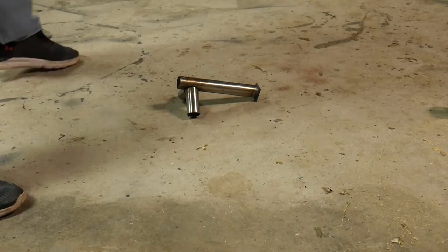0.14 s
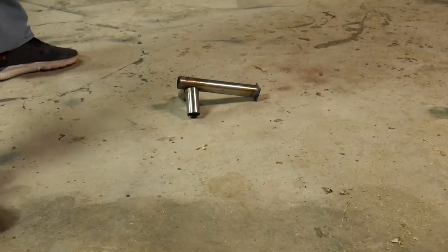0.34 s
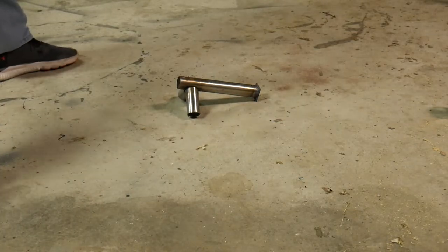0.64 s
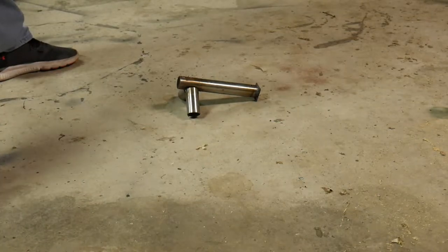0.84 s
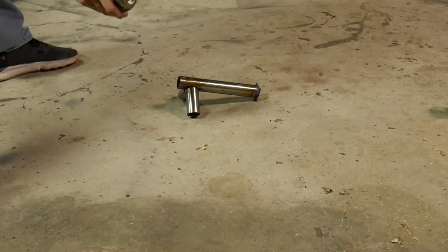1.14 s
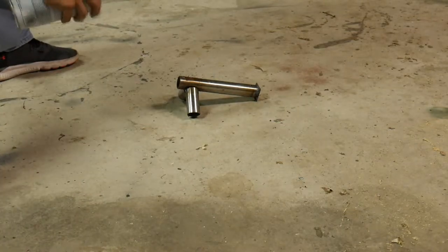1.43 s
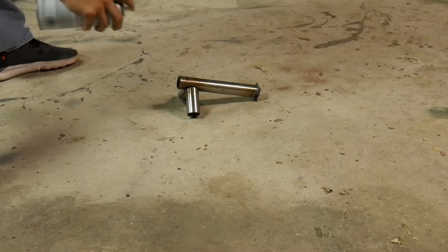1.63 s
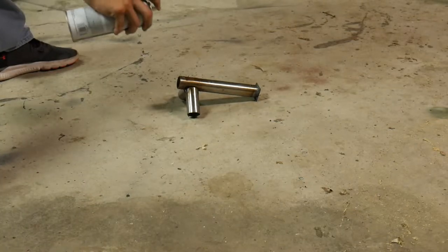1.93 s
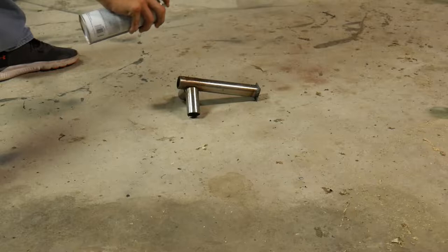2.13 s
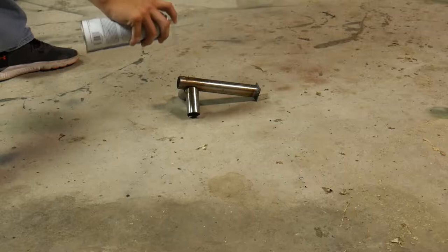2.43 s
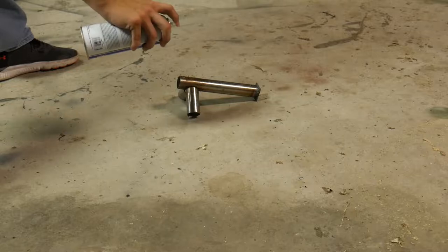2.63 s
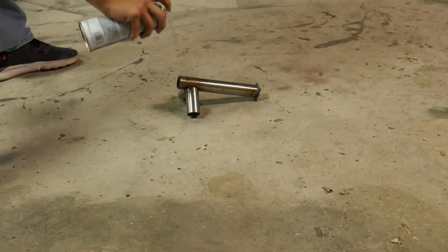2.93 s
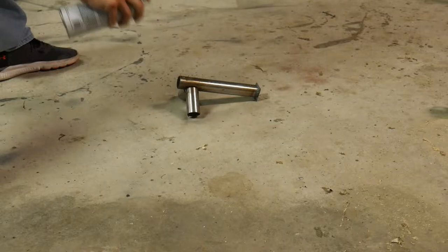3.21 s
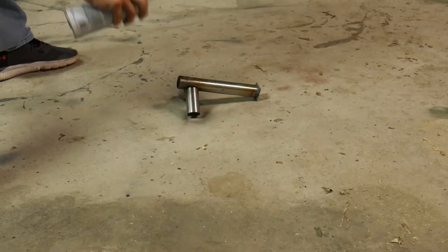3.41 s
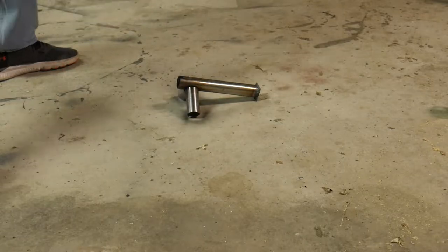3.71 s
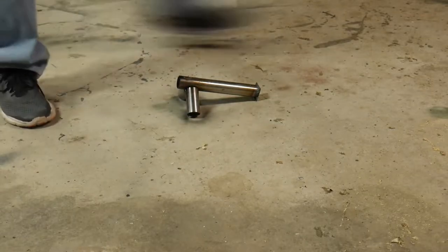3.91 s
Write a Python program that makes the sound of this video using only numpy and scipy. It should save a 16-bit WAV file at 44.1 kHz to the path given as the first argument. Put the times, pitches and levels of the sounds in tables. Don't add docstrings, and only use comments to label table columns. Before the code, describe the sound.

Shoes scuff gritty concrete, a paint can is shaken in a hard metallic rattle, then the nozzle puffs in brief hissing bursts.

```python
import sys
import numpy as np
from scipy import signal
from scipy.fft import rfft, irfft
from scipy.io import wavfile
from scipy.ndimage import uniform_filter1d

SR = 44100
rng = np.random.default_rng(int(sys.argv[2]) if len(sys.argv) > 2 else 0)


def natural_amplitude(level_db):
    exponent = np.asarray(level_db, float) / 20
    return 10 ** exponent


def persist_wave(psi):
    counts = np.round(np.clip(psi, -1, 1) * 32767).astype(np.int16)
    wavfile.write(sys.argv[1], SR, np.atleast_2d(counts).T)


N = 179090
TIME = np.arange(N) / SR
CONTACT_MS = 2.5


def knocks():
    length = 1024
    near, around = np.zeros(N + length), np.zeros(N + length)
    t = TIME[:length]
    impulse = 1. * (t == 0)
    for s, db, *colour in contacts():
        push = rng.standard_normal(length) * np.exp(-(1000 * t / CONTACT_MS) ** 2)
        push[0] += 3.0
        body = can(push, *colour, blur=1.0)
        body *= natural_amplitude(db) / np.abs(body).max()
        spread = can(impulse, *colour, blur=2.1)
        i = int((s + 0.00056) * SR)
        near[i:i + length] += body
        around[i:i + length] += spread * np.std(body) / np.std(spread)
    return near[:N], around[:N]


# (t/s, peak level/dB, dome ring f/Hz, wall ring level/dB, crack level/dB)
BALL_KNOCKS = [(0.7679, -14, 1430, -21, -21), (.834, -26, 1590, -1, 5), (.849, -28, 1560, -16, -24),
               (.99, -6, 1710, -31, -16), (.997, -16, 1480, -21, -21), (1.047, -18, 1340, -27, -16),
               (1.113, 0.5, 1760, -2.5, 2), (1.154, -8, 1400, -10, -22), (1.251, 0.5, 1320, -14, 2),
               (1.458, -11, 1460, -30, -8), (1.461, -4, 1750, -12, -4.5), (1.492, -12.5, 1380, -12.5, -22),
               (1.56, -30.5, 1200, -31, -21), (1.616, -18, 1270, -12, -19.5),
               (1.709, -21.5, 1360, -12, -16), (1.767, -21.5, 1424, -24.5, -18.5),
               (1.809, -28.5, 1540, -19, -15), (1.837, -29, 1040, -13, -17.5),
               (1.976, -36.5, 1080, -31.5, -17.5), (1.997, -39, 1560, -21, -32.5),
               (3.073, -19.5, 1300, -15, -2), (3.1047, -31.5, 1540, -12, -18)]
# (t/s, peak level/dB, crack level/dB,
# crack centre f/Hz)
SMALL_TICKS = [(.014, -51, 4, 7500), (.084, -30, -11.5, 7100), (.109, -39, -17, 7000),
               (.211, -37.5, -18.5, 3430), (.246, -45.5, -10.5, 5870), (.257, -40, -6.5, 4060),
               (.309, -34.5, -7.5, 4120), (.321, -33, -8.5, 3200), (.358, -23, 0.5, 7930),
               (.57, -35, 2, 5500), (.61, -33, -18.5, 3950), (.62, -32.5, -10, 5940),
               (.628, -24.5, -13.5, 3470), (.648, -27, -2.5, 3230), (.659, -36, -5, 3500),
               (2.489, -27.5, -5.5, 3715), (2.792, -46.5, -16.5, 6820), (2.81, -50.5, -22.5, 6820),
               (2.822, -47, -28, 6810), (2.834, -41, -33, 8830)]
TICK_DOME_HZ, TICK_WALL_DB = 1451, -25.5
SQUARE_CRACK_HZ, GLANCE_HZ_PER_DB = 3560, 44.5


def contacts():
    hits = [(s, db, TICK_DOME_HZ, TICK_WALL_DB, *crack) for s, db, *crack in SMALL_TICKS]
    for row in BALL_KNOCKS:
        crack_db = row[-1]
        hits.append((*row, SQUARE_CRACK_HZ - GLANCE_HZ_PER_DB * min(crack_db, 0)))
    return sorted(hits)


# (f/Hz, width/Hz, level/dB)
CRACK_RINGS = [(2852, 650, -5), (3790, 610, -10.5), (5550, 1800, -13.5)]
# (f/Hz, width/Hz, level/dB)
FIRST_TICK = [(8630, 470, -17.5), (13500, 4300, -21)]
WALL_HZ, PAINT_DAMPS_UNDER_HZ, FIRST_CONTACT_MS = 2200, 800, 0.8
EDGE_PER_CRACK = 0.15


def can(push, dome_hz, wall_db, crack_db, crack_hz, blur):
    def steep(hz, width, x=push):
        return level(ring_twice(x, hz, blur * width), 0)

    crack = steep(crack_hz, 0.63 * crack_hz)
    crack = crack + sum(natural_amplitude(db) * steep(hz, width) for hz, width, db in CRACK_RINGS)
    dome = steep(dome_hz, 870)
    wall = steep(WALL_HZ, 330 / blur)
    body = dome + natural_amplitude(wall_db + 12) * wall + natural_amplitude(crack_db + 9.5) * crack
    paint = signal.butter(2, PAINT_DAMPS_UNDER_HZ, "high", fs=SR, output="sos")
    body = signal.sosfilt(paint, body)
    first = push * np.exp(-1000 * TIME[:len(push)] / FIRST_CONTACT_MS)
    tick = sum(natural_amplitude(db) * steep(hz, blur * width, first) for hz, width, db in FIRST_TICK)
    return level(body, 0) + natural_amplitude(EDGE_PER_CRACK * (crack_db + 12.5)) * tick


# (start t/s, held/s, hiss level at closing/dB, low roar over hiss/dB, dying/dB per s)
NOZZLE_PRESSES = [(2.487, 0.069, -38, -2.5, 324), (2.6, .02, -61, -4, 153), (2.836, 0.16, -39, -2.5, 300),
                  (3.04, 0.041, -57, -4, 1000), (3.08, 0.0053, -56, -17, 903), (3.105, 0.007, -51, 5, 1500),
                  (3.156, 0.041, -45, -4, 683), (3.247, 0.048, -44.5, -5, 650), (3.344, .063, -46, -5, 852),
                  (3.442, 0.054, -44, -4.5, 604), (3.55, 0.053, -45, -5, 818),
                  (3.645, 0.057, -42.5, -5, 898.5), (3.79, 0.029, -61, 4.5, 1003.5)]
# (f/Hz, density level/dB per Hz)
JET_COLOUR = [(240, -31.5), (400, -8), (460, -14.5), (852, -6.5), (1560, -6), (1990, -11.5), (2320, -6),
              (2550, -4), (3260, -6.5), (4240, -2.5), (6540, -12.5), (8630, -7), (10100, -11), (13700, -9),
              (16000, -19)]
# (f/Hz, width/Hz, level/dB)
NOZZLE_WHISTLE = [(8200, 930, -13), (12640, 700, -16), (13840, 600, -14)]
VALVE_OPENS_S, HISS_SWELL_DB_S, ROAR_SWELL_DB_S = 0.0099, 12.5, 47


def spray():
    gas = rng.standard_normal(N) * natural_amplitude(1.2 * walk(300))
    jet = level(shape(gas, JET_COLOUR), 0)
    jet = jet + sum(level(ring(gas, hz, width), db) for hz, width, db in NOZZLE_WHISTLE)
    low, high = two_bands(jet, 5870)
    hiss, roar = np.zeros(N), np.zeros(N)
    for s, held, db, roar_db, dies in NOZZLE_PRESSES:
        hiss += press(s, held, db, HISS_SWELL_DB_S, VALVE_OPENS_S, dies)
        roar += press(s, held, db + roar_db, ROAR_SWELL_DB_S, VALVE_OPENS_S, dies)
    return hiss * high * natural_amplitude(0.52 * walk(32.6)) + roar * low * natural_amplitude(0.56 * walk(29.2))


# (start t/s, held/s, level at lifting/dB, swell/dB per s, treble over body/dB)
SOLE_DRAGS = [
    (-.05, 0.081, -54.5, -150, -2),
    (.03, 0.36, -58, -2, -5),
    (.215, 0.026, -59.5, 5, 1.5),
    (0.336, .075, -38.5, 0, -5),
    (.41, 0.071, -36, 8, 0),
    (.49, 0.16, -60.5, -110, -2.5),
    (.605, .165, -43.5, 12, -3.5),
    (.77, 0.09, -50.5, -86.5, -2),
    (3.875, 0.071, -41.5, 141, -10.5),
]
# (f/Hz, density level/dB per Hz)
GRIT_COLOUR = [(120, -24), (200, -11), (416, -9.5), (709, -4), (1210, -5.5), (1710, -4), (2380, -3),
               (8580, -1), (11300, -9), (14100, -8), (16000, -29)]
# (start t/s, held/s, level/dB, f/Hz, width/Hz)
NARROW_TONES = [
    (0, 0.17, -60.5, 2080, 350),
    (.35, 0.056, -54, 800, 500),
    (0.438, 0.025, -43, 699, 250),
    (0.631, 0.2, -49.5, 3520, 1400),
    (3.915, 0.033, -58.5, 1140, 600),
]
SOLE_LANDS_S, SOLE_LIFTS_DB_S, SPEED_BRIGHTENS_DB_S = 0.014, 550.5, 10.5


def scuff():
    grain_size = natural_amplitude(1.7 * np.minimum(rng.exponential(size=N), 4))
    grains = rng.standard_normal(N) * (rng.random(N) < 3500 / SR) * grain_size
    rub = level(grains, -3.5) + level(rng.standard_normal(N), -2.5)
    low, high = two_bands(shape(rub * natural_amplitude(2.0 * walk(230)), GRIT_COLOUR), 4000)
    body, treble, tread = np.zeros(N), np.zeros(N), np.zeros(N)
    for s, held, db, swell, treble_db in SOLE_DRAGS:
        body += press(s, held, db, swell, SOLE_LANDS_S, SOLE_LIFTS_DB_S)
        treble += press(s, held, db + treble_db, swell + SPEED_BRIGHTENS_DB_S, SOLE_LANDS_S, SOLE_LIFTS_DB_S)
    for s, held, db, hz, width in NARROW_TONES:
        tread += press(s, held, db, 0, SOLE_LANDS_S, SOLE_LIFTS_DB_S) * level(ring_twice(rub, hz, width), 0)
    return body * low + treble * high + tread


LET_GO_S = 0.0042


def press(start, held, db, swell_db_s, opens, dies_db_s):
    after = TIME - start - held
    opening = 1 - np.exp(-np.maximum(TIME - start, 0) / opens)
    released = LET_GO_S * np.logaddexp(0, np.minimum(after, 1) / LET_GO_S)
    return opening * natural_amplitude(db + swell_db_s * np.clip(after, -held, 0) - dies_db_s * released)


# (t/s, peak level/dB, f/Hz, width/Hz)
SOFT_THUDS = [
    (0.211, -34.5, 397, 350),
    (1.113, -33, 120, 296),
    (3.951, -37.5, 402, 300),
]


def thuds():
    out, push = np.zeros(N), np.pad(np.hanning(40), (0, 4000))
    for s, db, hz, width in SOFT_THUDS:
        body = ring(push, hz, width)
        out[int(s * SR):][:len(push)] += body * natural_amplitude(db) / np.abs(body).max()
    return out


# (f/Hz, t60/s, level/dB)
GARAGE_TAIL = [(350, 0.37, -38), (690, 0.3, -40), (1296, 0.71, -40), (3024, 0.4, -41), (4010, 0.76, -35.5),
               (5940, 0.7, -34), (8140, 0.63, -43), (11740, .7, -40), (14230, 0.46, -32)]
BEFORE_WALLS_DB = -4


def garage(x):
    t = TIME[:SR]
    tail = np.zeros(SR)
    for hz, t60, db in GARAGE_TAIL:
        band = level(ring_twice(rng.standard_normal(SR), hz, hz), -20.5)
        tail += natural_amplitude(db) * np.exp(-np.log(1000) * t / t60) * band
    build_up = np.clip((t - 0.015) / 0.003, 0, 1)
    side_walls = 0.2 * np.exp(-((t - 0.019) / 0.004) ** 2)
    far_wall = 0.31 * np.exp(-((t - 0.032) / 0.012) ** 2)
    tail *= natural_amplitude(BEFORE_WALLS_DB) + build_up + side_walls + far_wall
    return signal.fftconvolve(x, tail)[:N]


# (f/Hz, density level/dB per Hz)
AIR_COLOUR = [(20, -14), (40, -6), (80, -2), (200, -3), (300, -1), (550, -9.5), (1100, -12), (1900, -21),
              (5500, -29), (9500, -34.5), (16000, -33.5)]
AIR_DB = -57.5
# (f/Hz, width/Hz, level/dB)
HUM_LINES = [(194.5, 11, -66), (273.4, 18, -67.5), (527.7, 7.8, -69)]
# (f/Hz, width/Hz, level/dB)
INSECT_BANDS = [(6980, 830, -68), (8280, 500, -73)]
# (t/s, level/dB)
CHORUS_SWELL = [(0, 4.5), (.15, 2.5), (1, 2), (2.2, 2.5), (3, 3), (3.3, -3.5), (4.06, 1.5)]


def background():
    def narrow(lines):
        return sum(level(ring_twice(rng.standard_normal(N), hz, width), db) for hz, width, db in lines)

    air = level(shape(rng.standard_normal(N), AIR_COLOUR), AIR_DB) * natural_amplitude(0.27 * walk(2))
    chorus = narrow(INSECT_BANDS) * natural_amplitude(2 * walk(130))
    swell = natural_amplitude(np.interp(TIME, *np.transpose(CHORUS_SWELL)))
    return air + narrow(HUM_LINES) + chorus * swell


def shape(x, table):
    hz, db = np.transpose(table)
    f = np.maximum(np.arange(len(x) // 2 + 1) * SR / len(x), 1)
    return irfft(rfft(x) * natural_amplitude(np.interp(np.log(f), np.log(hz), db)), len(x))


def ring(x, hz, width):
    return signal.lfilter(*signal.iirpeak(hz, hz / width, SR), x)


def ring_twice(x, hz, width):
    return ring(ring(x, hz, width), hz, width)


def level(x, db):
    return x * natural_amplitude(db) / np.sqrt(np.mean(x ** 2))


def walk(rate):
    k = int(SR / rate)
    return uniform_filter1d(np.repeat(rng.standard_normal(N // k + 1), k), k)[:N]


def two_bands(x, hz):
    low = signal.sosfiltfilt(signal.butter(2, hz, fs=SR, output="sos"), x)
    return level(low, 0), level(x - low, 0)


# (f/Hz, level/dB)
MIC_PORT = [(20, 1.5), (9000, -0.5), (10300, -3), (11800, 0), (16000, 2)]
# (f/Hz, level/dB)
SIDE_COLOUR = [(30, -23), (300, -29.5), (1500, -28.5), (4000, -28.5), (9000, -24.5), (16000, -21.5)]
SELF_NOISE_DB, SIDE_PATCHY_DB = -78, 6
DUCK_S, DUCK_DB = 3.128, -4


def scene():
    (ball, around), jet, shoe = knocks(), spray(), scuff()
    duck = natural_amplitude(np.interp(TIME, [DUCK_S, DUCK_S + 0.0019], [0, DUCK_DB]))
    reverb = garage(around + natural_amplitude(-4.0) * jet + natural_amplitude(-6.0) * shoe)
    diffuse = duck * (reverb + background())
    mid = shape(ball + thuds() + jet + shoe + diffuse, MIC_PORT)
    side = shape(diffuse * walk(150), SIDE_COLOUR)
    side += natural_amplitude(-28) * mid * walk(300)
    side += level(rng.standard_normal(N), SELF_NOISE_DB)
    side *= natural_amplitude(2.5 + SIDE_PATCHY_DB * walk(22))
    return np.array([mid + side, mid - side])


# (f/Hz, level/dB)
MIC_ROLLOFF = [(20, 0), (15650, 0), (15850, -35), (16600, -38), (17000, -70)]
CEILING = 0.8


def roll_off(x):
    return signal.sosfilt(signal.butter(12, 16660, fs=SR, output="sos"), x)


def record(dry):
    rounded = CEILING * np.tanh(dry / CEILING)
    mix = np.array([shape(x, MIC_ROLLOFF) for x in rounded])
    return roll_off(mix)


dry = scene()
out = record(dry)
persist_wave(out)
```